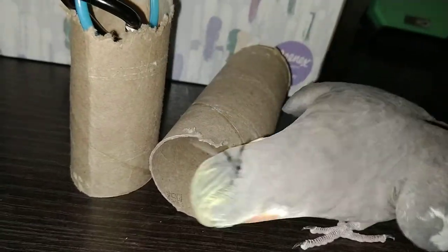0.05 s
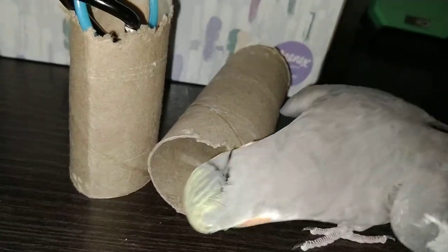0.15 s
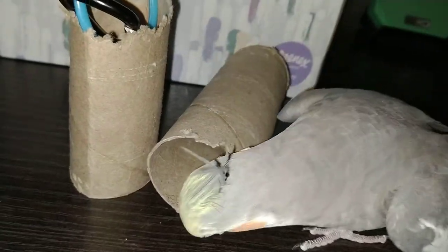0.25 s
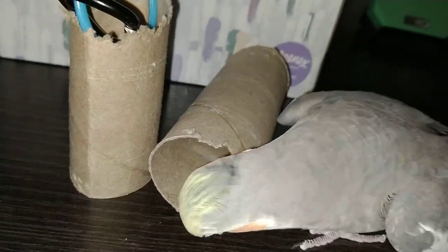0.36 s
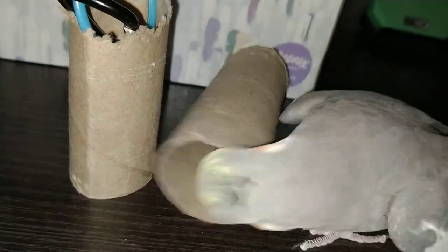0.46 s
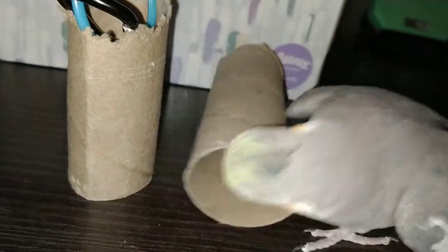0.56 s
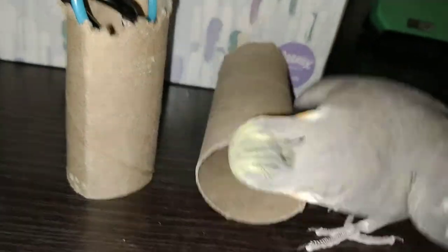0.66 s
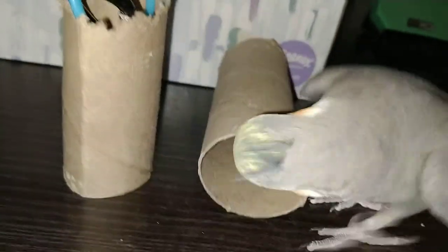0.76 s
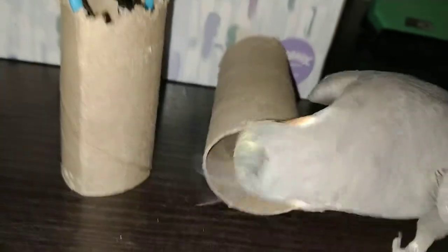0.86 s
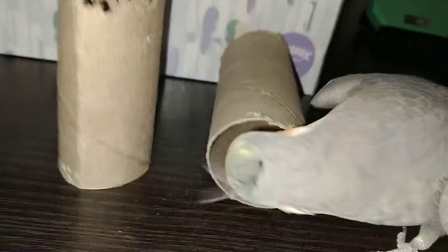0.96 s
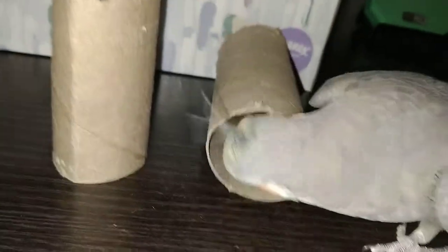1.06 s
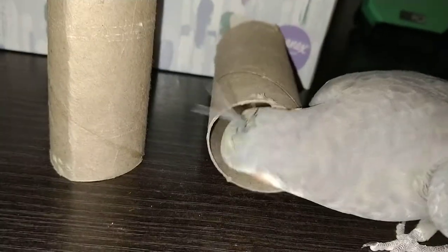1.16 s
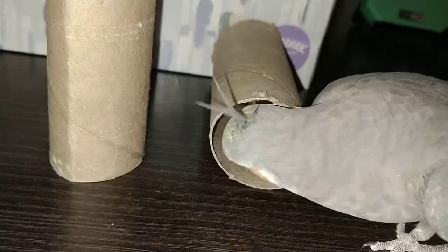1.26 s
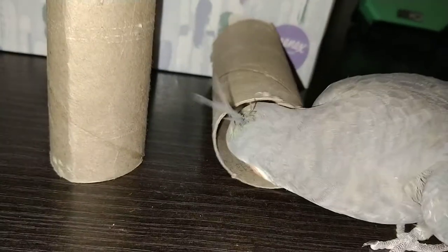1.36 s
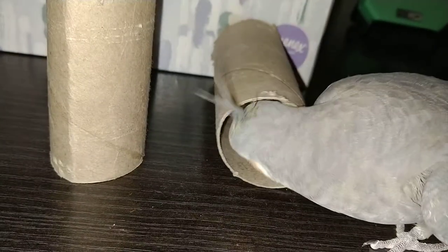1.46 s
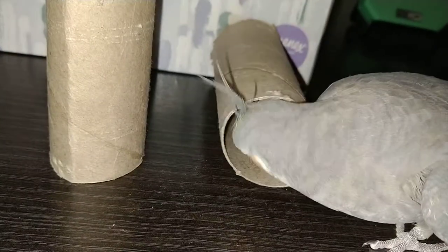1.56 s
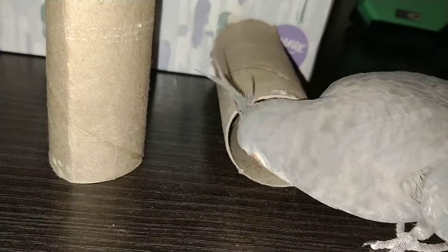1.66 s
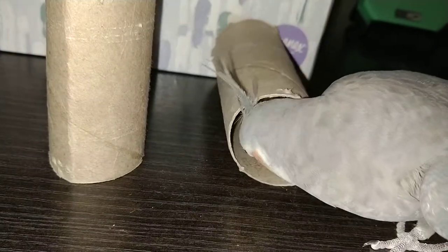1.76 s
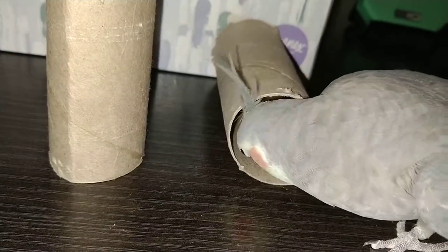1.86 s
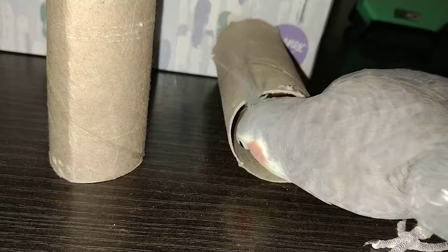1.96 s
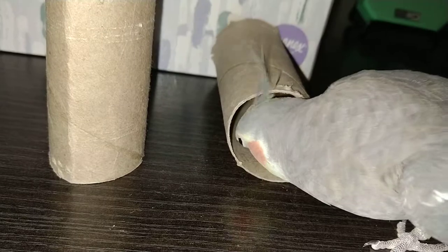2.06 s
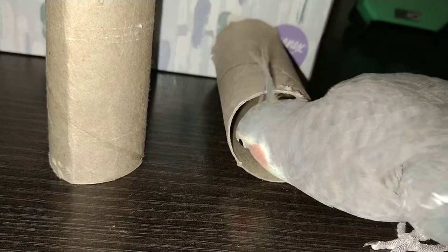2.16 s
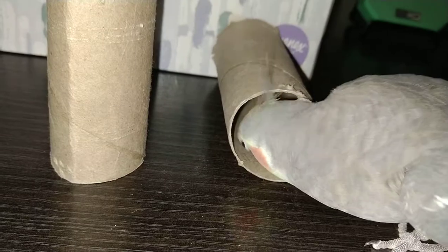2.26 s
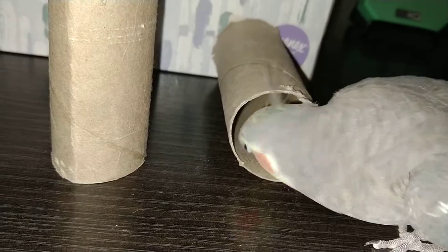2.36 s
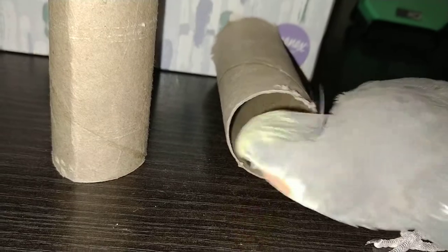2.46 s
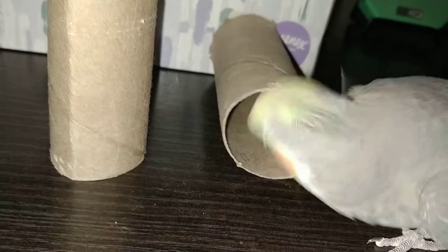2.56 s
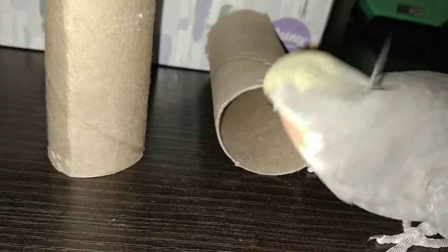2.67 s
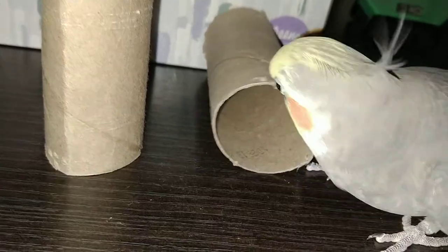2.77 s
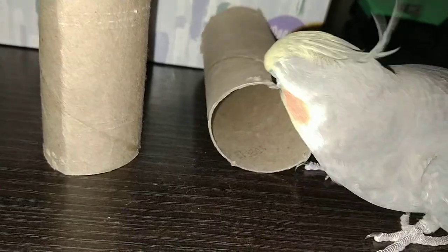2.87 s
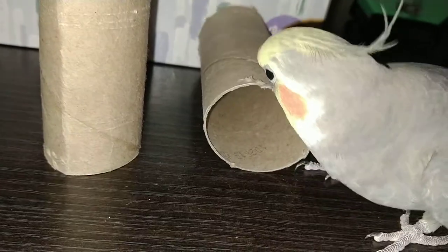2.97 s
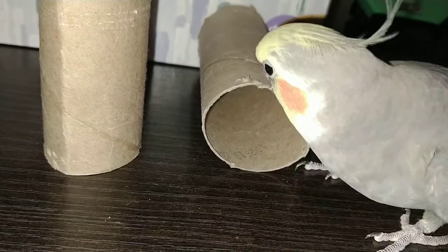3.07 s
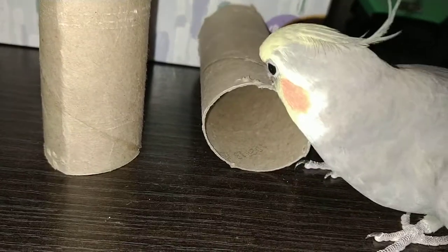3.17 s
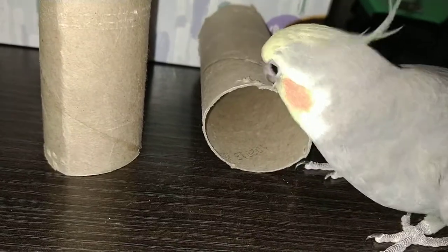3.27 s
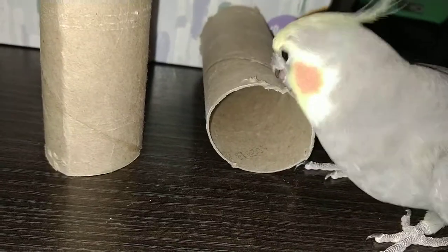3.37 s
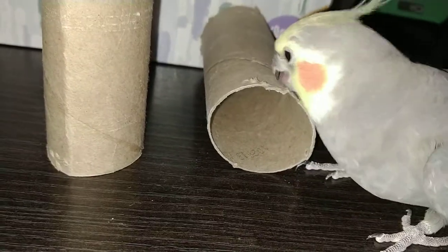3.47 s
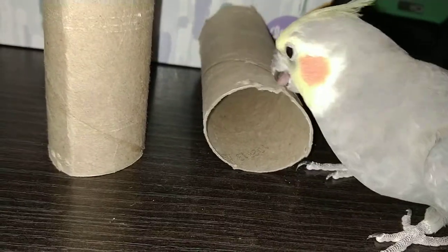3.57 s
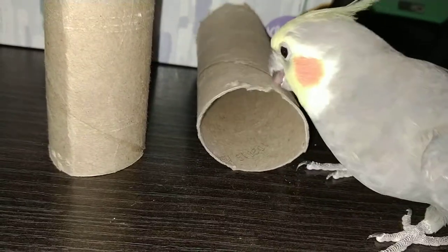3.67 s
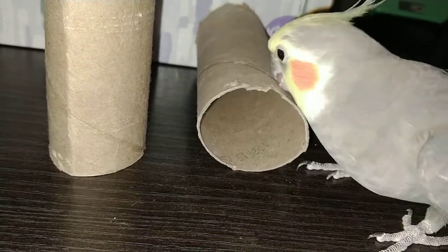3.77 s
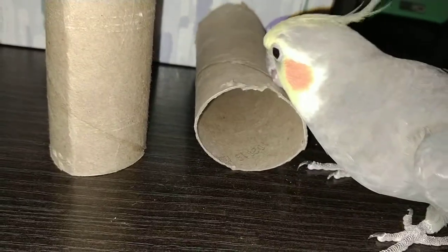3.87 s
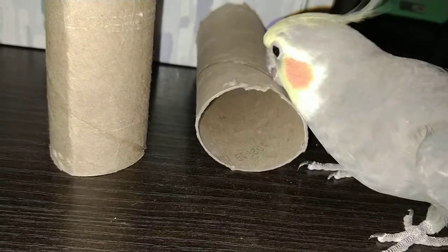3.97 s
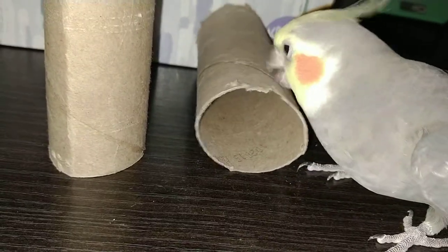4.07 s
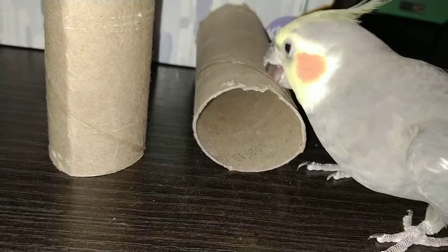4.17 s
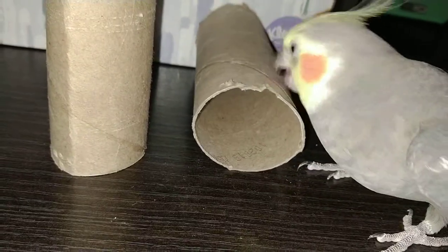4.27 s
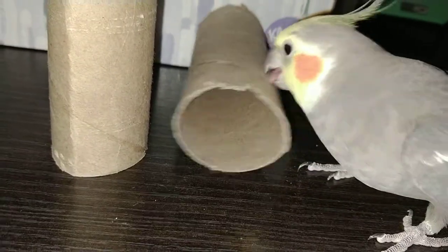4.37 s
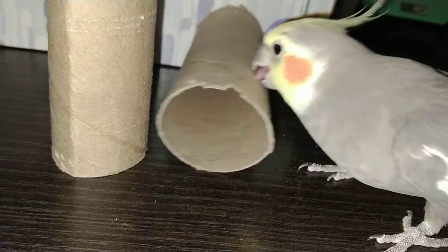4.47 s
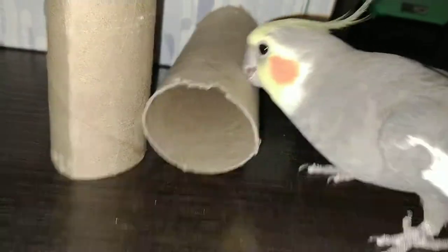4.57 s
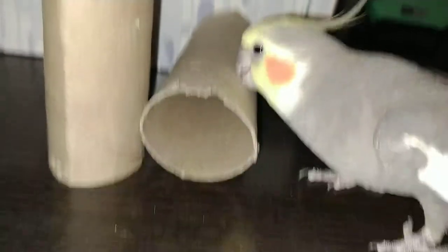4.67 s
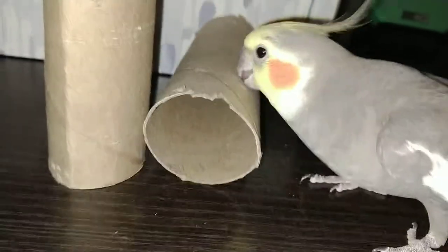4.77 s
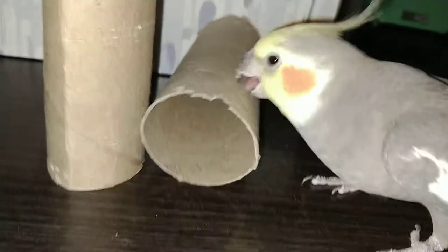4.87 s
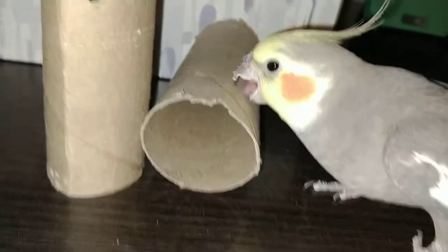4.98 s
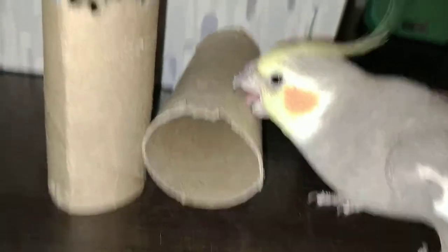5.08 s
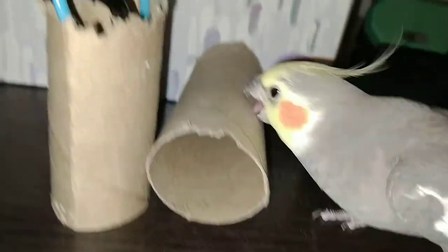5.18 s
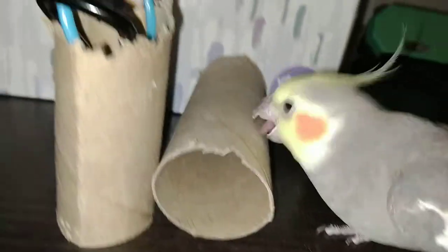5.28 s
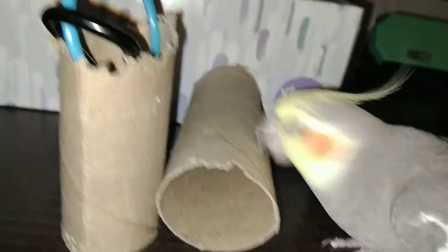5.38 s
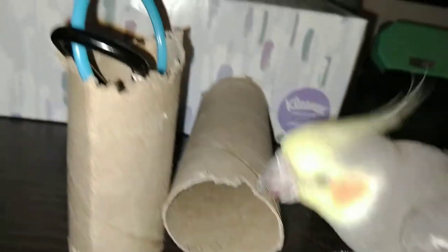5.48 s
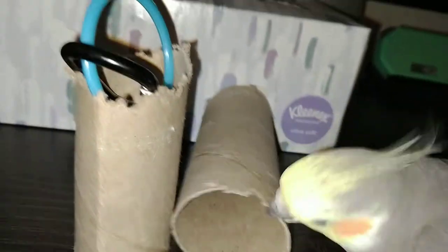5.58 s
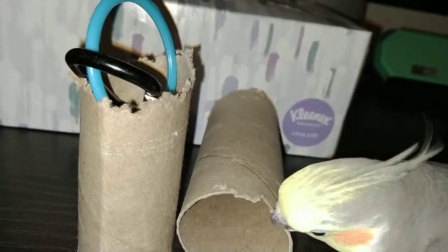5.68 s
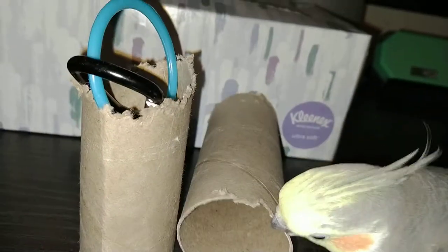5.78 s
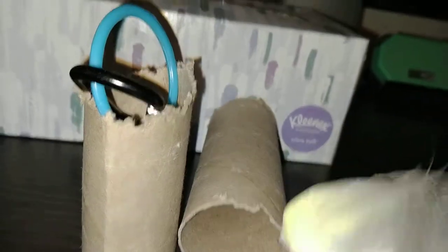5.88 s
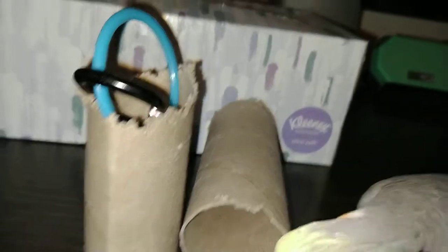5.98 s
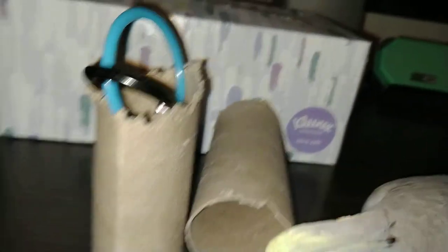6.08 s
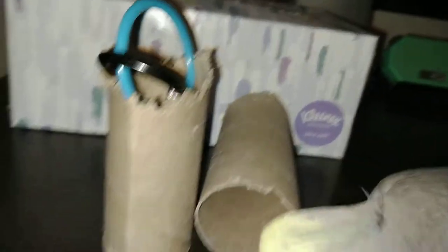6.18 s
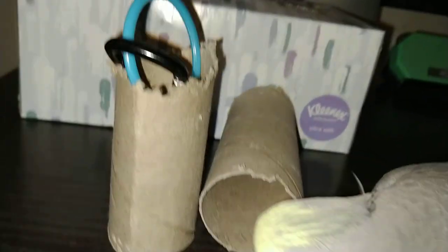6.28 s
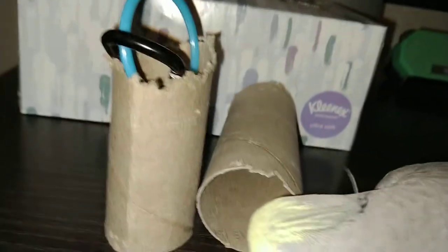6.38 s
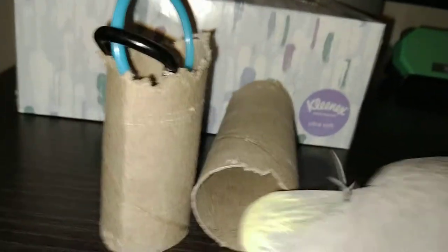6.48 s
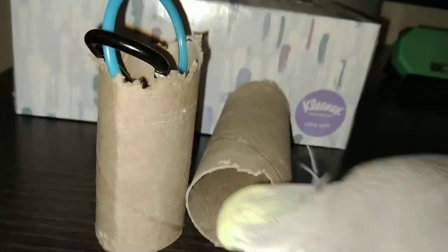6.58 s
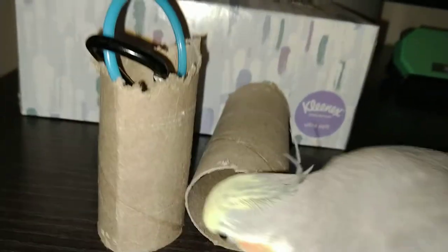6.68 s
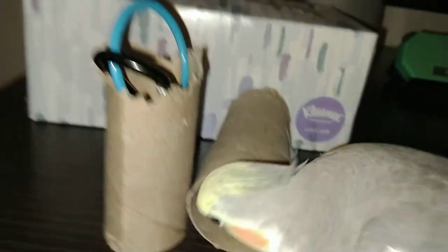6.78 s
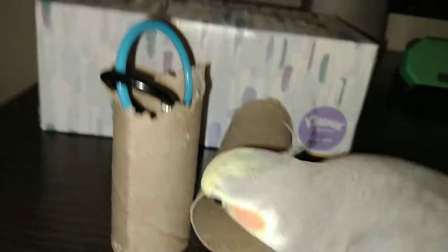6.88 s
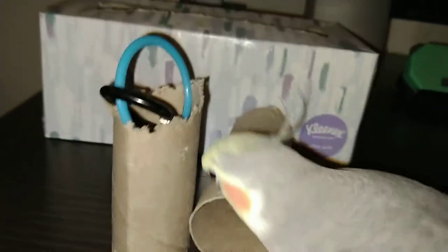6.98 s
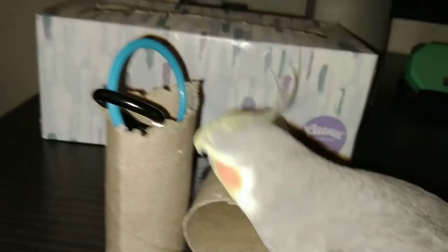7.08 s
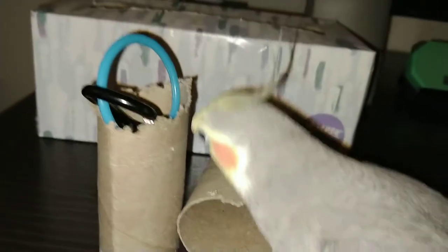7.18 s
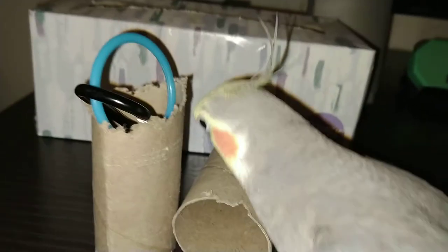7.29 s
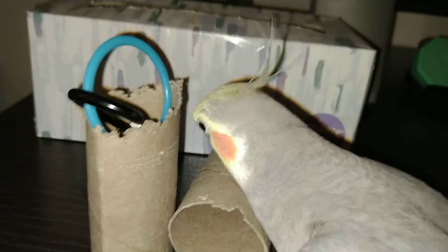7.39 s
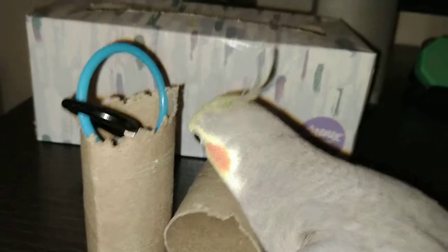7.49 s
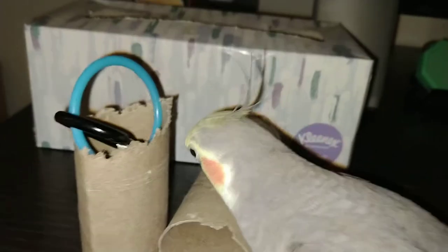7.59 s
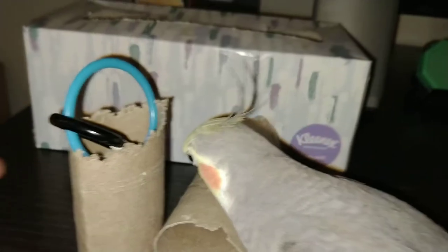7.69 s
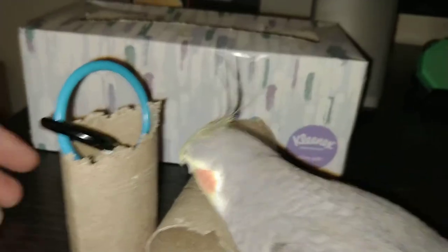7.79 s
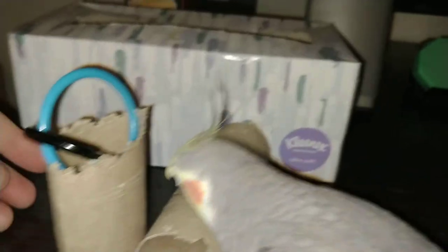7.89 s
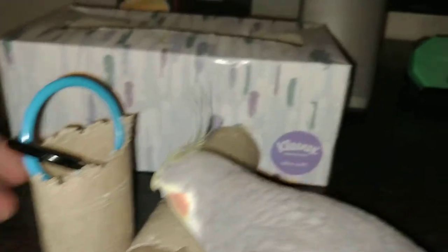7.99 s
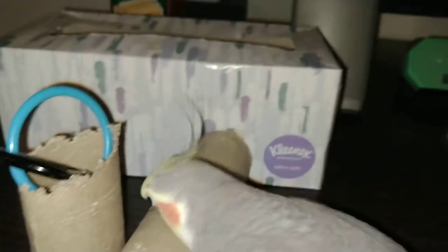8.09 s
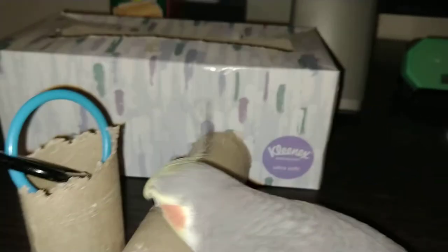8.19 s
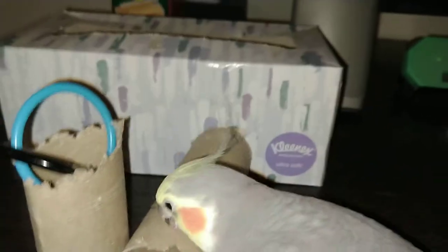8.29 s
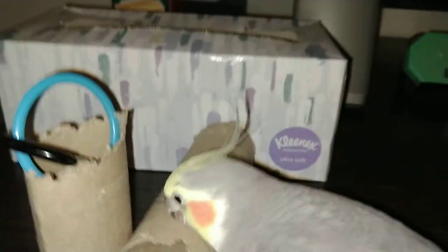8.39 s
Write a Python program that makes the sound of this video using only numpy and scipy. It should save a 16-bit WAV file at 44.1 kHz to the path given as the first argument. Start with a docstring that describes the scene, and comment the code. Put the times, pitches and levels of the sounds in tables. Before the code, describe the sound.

Close up in a quiet room, a pet bird works at a cardboard tube on a table. Faint hiss, hum and feather rustle come first, then a crack and dull knocks, and a heavy brushing thump just after one second. Light snaps and hollow tube rings grow busier around five seconds. Several low bumps follow near six, then quiet and a few last pecks.

```python
"""A cockatiel nibbles and nudges a cardboard tube on a table, close to a hand-held phone in a quiet room.
Room tone with a faint hum, a rumble of small shakes and a hiss of feathers are there from the start.
From 0.7 s dull knocks (soft pushes stirring damped modes) join in, then pecks: snap, crack and hollow ring.
From 1.1 s something brushes the phone (stick-slip noise) and the dragging beak makes the tube ring and crackle.
The strokes end by 6 s, brushes and knocks by 6.8 s; after a faint rustle, last pecks fall at 8.1 to 8.4 s."""
import sys
import numpy as np
from scipy import signal
from scipy.fft import rfft, irfft, next_fast_len
from scipy.io import wavfile

SR = 44100
rng = np.random.default_rng(int(sys.argv[2]) if len(sys.argv) > 2 else 0)


def wrap_up_sound(samples):
    """Save the sound to the file named by the first command line argument, as 16-bit audio."""
    columns = np.atleast_2d(samples).T
    # keep every value between -1 and 1, then stretch to whole-number steps
    tamed = np.clip(columns, -1, 1)
    steps = np.round(tamed * 32767).astype(np.int16)
    wavfile.write(sys.argv[1], SR, steps)


N = 372412  # length [samples]

# Base level of the room tone, before the dips: (time [s], level [dB])
ROOM_LEVEL = [(0, -58), (2, -58.5), (4.6, -58.5), (5.5, -56), (6.5, -54), (8.44, -56.5)]
# Brief sinks of the room tone, each creeping back: (time [s], nominal depth [dB])
DIPS = [(0.81, 5.5), (1.25, 7), (2.25, 3.5), (3.2, 10), (4.82, 4.5), (6.1, 4.5), (8.25, 8.5)]
# Base level of the handling rumble, before shuffles and strokes: (time [s], level [dB])
RUMBLE_LEVEL = [(0, -58), (0.55, -56), (0.98, -74), (1.3, -51.5), (1.6, -49), (2.2, -49.5), (2.4, -56),
                (2.95, -39), (3.3, -56), (4.05, -56.5), (4.4, -47), (4.65, -54.5), (4.8, -38.5),
                (5.45, -45.5), (6.2, -38), (6.9, -57), (7.9, -56), (8.3, -86.5)]
# Shuffles that shake the phone: (start [s], length [s], level [dB])
SHUFFLES = [(2.78, 0.058, -36), (3.72, 0.028, -47), (4.21, 0.023, -43), (5.83, 0.14, -27.5),
            (6.28, 0.081, -33.5), (6.62, 0.14, -36)]
# Feathers sliding as the bird moves: (start [s], length [s], level [dB])
RUSTLES = [(0, 0.38, -73.5), (0.3, .12, -69.5), (0.585, 0.042, -55), (0.67, 0.11, -59),
           (1.09, 0.061, -43.5), (1.235, 0.012, -57), (5.972, 0.0053, -57.5), (6.655, 0.0067, -56),
           (6.738, 0.023, -54), (6.8, 1, -84), (7.62, 0.38, -67), (8.14, 0.15, -63.5)]
# Something brushing the phone: (start [s], length [s], thud level [dB], grit level [dB])
BRUSHES = [(1.088, 0.057, -46.5, -51), (1.16, 0.02, -35.5, -32), (1.181, 0.018, -13, -27.5),
           (1.205, 0.022, -17.5, -36), (1.234, 0.032, -13.5, -27.5), (5.97, 0.015, -27, -39.5),
           (6.018, 0.0027, -32, -39), (6.37, 0.022, -48, -56), (6.418, 0.0062, -46, -55),
           (6.7105, 0.016, -18.5, -38), (6.732, 0.022, -23.5, -43)]
# Dull knocks, a higher cut-off being a harder contact:
# (time [s], thud level [dB], contact cut-off [Hz], boom level [dB], crack level [dB])
KNOCKS = [(0.702, -29.5, 352, -29.4, -66), (0.75, -29.5, 316, -33, -64), (0.7837, -27, 320, -35.5, -60),
          (0.8059, -37.5, 332, -39.5, -70), (1.23, -11, 281, -27, -65), (1.279, -39, 257, -24.5, -84),
          (2.851, -16.5, 430, -13, -47.5), (2.898, -46.5, 278, -35.5, -84),
          (2.981, -44.5, 236.2, -31.5, -67), (4.8147, -15.5, 660, -21, -50.5), (4.8386, -23, 320, -32, -63),
          (5.915, -34, 283, -19, -58), (5.955, -26.5, 310, -38, -58), (5.983, -44, 402, -50, -47.5),
          (6.018, -26.5, 340, -27.3, -49.5), (6.098, -17.5, 617, -10.5, -90),
          (6.296, -38.5, 292, -31, -65.5), (6.3549, -26, 184, -47, -80), (6.374, -40, 268, -31, -72),
          (6.393, -28, 235, -34, -70.7), (6.422, -33.5, 302, -31, -68), (6.508, -49, 250, -28.5, -85),
          (6.5673, -16.5, 346, -28.5, -53), (6.589, -29, 390, -26.5, -65), (6.71, -43, 560, -25, -70),
          (6.722, -25, 640, -12, -60), (6.756, -44, 526, -41, -52)]
# Modes of what the knocks travel through: (frequency [Hz], highest level [dB], t60 [s])
BODY_MODES = [(337, -37.5, 0.0067), (433, -36, 0.012), (750, -36.5, 0.021)]
# Strokes of the beak over the tube: (start [s], length [s], ring level [dB], crackle level [dB])
SCRAPES = [(1.14, 0.021, -59, -44.5), (1.97, 0.065, -73, -66), (2.08, 0.072, -69, -76),
           (2.25, .04, -66, -72), (2.818, 0.0067, -43.5, -48.5), (3.0, .15, -65, -68),
           (3.65, 0.12, -68.5, -76.5), (4.08, 0.017, -58, -65), (4.22, 0.034, -67, -72.5),
           (4.315, 0.015, -58, -69), (4.44, .025, -63, -65), (4.71, 0.033, -62, -59),
           (4.772, 0.032, -53.5, -78), (4.872, 0.034, -60.5, -73), (5.02, 0.025, -56.5, -65.5),
           (5.125, 0.016, -50.5, -65.5), (5.26, 0.024, -41, -51), (5.44, .04, -54.5, -61),
           (5.576, .015, -47, -57.5), (5.61, 0.03, -45, -54.5), (5.69, 0.072, -63.5, -64),
           (5.842, 0.036, -61, -59)]
# Beak snapping off the cardboard: (time [s], ring level [dB], centre of the ring [Hz],
# snap level [dB], crack level [dB], left minus right of the crack [dB])
PECKS = [(0.806, -66, 1390, -40, -29, 6.5), (0.993, -68, 1174, -99, -59.5, 8),
         (1.643, -75, 960, -87, -74, 11), (1.954, -57, 1600, -44, -44, -4),
         (2.169, -44.5, 1670, -42.5, -48, -3), (2.2445, -40, 1640, -41, -42, 1),
         (2.569, -84, 992, -81, -65, 0), (2.853, -50, 775, -41, -51, 24), (3.05, -60, 980, -68, -81, 4),
         (3.106, -51, 1440, -60.5, -64, -4), (3.198, -53, 1280, -43.5, -39, 4.5),
         (3.945, -76, 830, -78, -74.5, 17), (4.0646, -38.5, 1140, -45, -43.5, -2),
         (4.215, -48.5, 1010, -75, -60, -1), (4.43, -47.5, 925, -72, -61, 0),
         (4.704, -52, 1250, -67, -68, 0), (4.769, -35, 1160, -39, -48, 3),
         (4.814, -60, 919, -35.5, -66, 18), (4.8596, -42.5, 1040, -45.5, -44.5, -7),
         (4.9987, -47, 1020, -62, -57.5, -2), (5.012, -43.5, 1010, -63, -73, -1),
         (5.4335, -36.5, 1010, -74, -52.5, -1), (5.851, -65, 1138, -56, -70, 12),
         (6.657, -53.5, 1150, -57, -51, -5), (8.0758, -79, 1410, -44, -37.5, 7),
         (8.1624, -37.5, 1080, -73, -58, 6), (8.253, -40.5, 970, -40.5, -37, 3.5),
         (8.399, -51, 1120, -68.5, -71, 16)]
# Modes of the cardboard tube, before the contact favours some: (frequency [Hz], level [dB], t60 [s])
TUBE_MODES = [(808, 5.5, 0.029), (905, -1, 0.047), (1026, 3.5, 0.036), (1136, 2, 0.0081), (1150, 0, 0.017),
              (1414, -7, 0.061), (1480, -5, 0.046), (1550, -8, 0.047), (1770, -3, 0.016),
              (1828, -5.5, 0.017), (2620, -16.5, 0.04), (2970, -25.5, 0.021), (3170, -29, 0.014),
              (3800, -26.5, 0.017)]

# Spectrum of the background hiss: (frequency [Hz], relative density [dB per Hz])
ROOM_COLOUR = [(30, -16.5), (60, -17.5), (120, -1), (250, -5), (500, -13.5), (1000, -18), (2000, -28.5),
               (3200, -31), (5000, -36.5), (7000, -37), (11000, -33), (16000, -35)]
# Spectrum of the handling rumble: (frequency [Hz], relative density [dB per Hz])
RUMBLE_COLOUR = [(20, -22.5), (40, -17), (60, 4.5), (90, 2.5), (130, -0.5), (200, -10), (300, -23),
                 (500, -37)]
# Spectrum of sliding feathers: (frequency [Hz], relative density [dB per Hz])
RUSTLE_COLOUR = [(500, -11), (1000, -5), (2500, -11), (4000, -10.5), (6000, -10), (8000, -5.5),
                 (11000, 3.5), (14000, 0.5), (16000, -10)]
# Spectrum of the thudding under a brush: (frequency [Hz], relative density [dB per Hz])
THUD_COLOUR = [(30, -37.5), (60, -22.5), (100, 0.5), (180, -8.5), (280, -7.5), (450, -16), (700, -16.5),
               (1000, -41.5)]
# Spectrum of the grit on top of a brush: (frequency [Hz], relative density [dB per Hz])
GRIT_COLOUR = [(500, -11), (800, -3), (1400, -4), (2200, -12), (3200, -15.5), (4500, -28), (7000, -36.5)]
# Spectrum of fibre crackle and of a knock's faint crack: (frequency [Hz], relative density [dB per Hz])
CRACKLE_COLOUR = [(1500, -2), (3000, -0.5), (5500, -1), (7500, -1.5), (10500, -2), (13500, 3),
                  (16000, -11.5)]
# Filter curve of the short beak snap: (frequency [Hz], gain [dB])
SNAP_COLOUR = [(400, -5), (900, -5.5), (1600, 0.5), (3000, -1.5), (4500, -4.5), (6500, -21.5),
               (9000, -24.5)]
# Filter curve of the bright beak crack: (frequency [Hz], gain [dB])
CRACK_COLOUR = [(4000, -23), (7000, -3.5), (9000, -5), (11000, 3), (13500, 1.5), (15500, -7), (17000, -6)]

HUM_HZ, HUM_DB = 115, -5  # level relative to the room hiss
DIP_FALL_S, DIP_RECOVERY_DB_PER_S = .04, 10.5
SCRAPE_SHAKE_DB = 10  # rumble that a beak stroke sends through the table, relative to its ring
BOOM_HZ, BOOM_T60_S = 117.2, 0.048
# The bass trails a soft knock by this much; contacts harder than HARD_CONTACT_HZ arrive more compactly
BASS_LAG_S, HARD_CONTACT_HZ = 0.0031, 537
ROOM_T60_S = .45
PORT_LAG_S = .00042  # delay between the two microphones
HIT_SIZE, HIT_WINDOW_S = 8192, .01  # hit buffer [samples] and the window its level refers to [s]
CUTOFF_HZ = 16600


def from_db(db):
    """Decibels to gain."""
    return 10 ** (np.asarray(db) / 20)


def rms_one(x):
    """Scale to unit rms."""
    return x / np.sqrt(np.mean(x ** 2) + 1e-20)


def hit_level(x, db):
    """Scale a short sound so that its energy equals this rms level held for the hit window."""
    energy = np.sum(x ** 2) + 1e-20
    return x * from_db(db) * np.sqrt(HIT_WINDOW_S * SR / energy)


def level_curve(rows):
    """A (time, level) curve as a gain at every sample."""
    times, levels_db = np.transpose(rows)
    return from_db(np.interp(np.arange(N) / SR, times, levels_db))


def add(out, sound, time_s):
    """Mix a short stereo sound in at this time."""
    start = max(0, round(time_s * SR))
    part = sound[..., :N - start]
    out[..., start:start + part.shape[-1]] += part


def cut(x, hz, kind, order=2):
    """Butterworth low-pass or high-pass."""
    sos = signal.butter(order, min(hz, .45 * SR), kind, fs=SR, output="sos")
    return signal.sosfilt(sos, x + 1e-18)


def colour(x, spectrum):
    """Causal (minimum-phase) filter with this spectrum, falling away beyond its ends."""
    size = 2 * next_fast_len(len(x) // 2 + 1)
    hz, db = np.transpose(spectrum)
    hz = np.r_[hz[0] / 2, hz, hz[-1] * 2]
    db = np.r_[db[0] - 30, db, db[-1] - 40]
    bins_hz = np.arange(size // 2 + 1) * SR / size
    log_gain = np.log(from_db(np.interp(np.log(bins_hz + 1), np.log(hz), db)))
    # folding the cepstrum forward in time gives the minimum phase
    cepstrum = irfft(log_gain)[:size // 2]
    cepstrum[1:] *= 2
    response = np.exp(rfft(cepstrum, size))
    return irfft(rfft(x, size) * response)[:len(x)]


def ring(x, hz, t60):
    """One damped mode: a unit click sets a sine of height 1 ringing."""
    decay, angle = from_db(-60 / (t60 * SR)), 2 * np.pi * hz / SR
    feedback = [1, -2 * decay * np.cos(angle), decay ** 2]
    return signal.lfilter([0, np.sin(angle)], feedback, x + 1e-18)


def friction(per_s, spread_db):
    """Noise whose strength wanders at random, as fibres catch and slip; rms 1."""
    knots = np.clip(rng.standard_normal(N // 4), -2.2, 2.2)
    grip = np.interp(np.arange(N) * per_s / SR, np.arange(len(knots)), knots)
    return rms_one(rng.standard_normal(N) * from_db(spread_db * grip))


def burst(t60):
    """A puff of noise that dies away exponentially."""
    return rng.standard_normal(HIT_SIZE) * from_db(-60 * np.arange(HIT_SIZE) / SR / t60)


def strokes(rows, attack_s, build_db, release_s):
    """Gains of rubbing strokes, one per dB column: each sets in, presses harder by build_db, then lets go.
    Attack and release are the times for 20 dB."""
    t, power = np.arange(N) / SR, 0
    for start, length, *levels_db in rows:
        before = np.maximum(start - t, 0) / attack_s
        after = np.maximum(t - start - length, 0) / release_s
        pressure_db = build_db * (np.clip((t - start) / length, 0, 1) - 1)
        shape_db = pressure_db - 20 * np.minimum(before + after, 10)
        power = power + np.outer(from_db(levels_db), from_db(shape_db)) ** 2
    return np.sqrt(power)


def beak_strokes():
    """Gains of the tube's ring and of the fibre crackle while the beak drags."""
    return strokes(SCRAPES, attack_s=0.03, build_db=5.0, release_s=0.038)


def balance(left_db):
    """Left and right gains with this level difference and unit rms."""
    return rms_one(from_db([[left_db / 2], [-left_db / 2]]))


def ports(x, left_db, left_first):
    """Two microphones of opposite polarity at the ends of the phone; the farther one hears later."""
    late = np.r_[np.zeros(round(PORT_LAG_S * SR)), x][:len(x)]
    pair = np.array([x, -late] if left_first else [late, -x])
    return pair * balance(left_db)


def spread(make, likeness, left_db, left_first):
    """A noisy source: one part reaches both microphones, the rest differs between them."""
    both = np.sqrt(likeness) * ports(rms_one(make()), 0, left_first)
    own = np.sqrt(1 - likeness) * np.array([rms_one(make()), rms_one(make())])
    return (both + own) * balance(left_db)


def disperse(x, bass_lag_s, hz):
    """Bending waves travel slower the lower they are, so a knock arrives as a falling chirp."""
    f = np.arange(len(x) + 1) * SR / (2 * len(x))
    phase = 2 * np.pi * bass_lag_s * hz * np.arctan(f / hz)
    return irfft(rfft(x, 2 * len(x)) * np.exp(-1j * phase))[:len(x)]


def reverb(x, t60, wet_db):
    """The room's faint, dull, diffuse tail, different at each microphone."""
    t = np.arange(SR // 2) / SR
    tail = rng.standard_normal((2, len(t))) * from_db(-60 * t / t60) * (t > .003)
    tail /= np.sqrt(np.sum(tail ** 2, axis=1, keepdims=True))
    dull_tail = cut(tail, hz=6000, kind="low", order=1)
    return from_db(wet_db) * signal.fftconvolve(x, dull_tail, axes=1)[:, :N]


def dips():
    """Gain of the room tone as it sinks quickly and creeps back; the deepest dip wins."""
    t, sunk_db = np.arange(N) / SR, []
    for start, depth_db in DIPS:
        fall = np.clip((t - start) / DIP_FALL_S, 0, 1)
        remaining_db = np.maximum(depth_db - DIP_RECOVERY_DB_PER_S * (t - start), 0)
        sunk_db.append(fall * remaining_db)
    return from_db(-np.max(sunk_db, axis=0))


def room_tone():
    """Soft, smooth background noise with a faint hum whose phase wanders slowly."""
    hiss = spread(lambda: colour(rng.standard_normal(N), ROOM_COLOUR),
                  likeness=0.69, left_db=1.0, left_first=True)
    wobble = rms_one(cut(rng.standard_normal(N), 3.4, "low"))
    hum = np.sin(2 * np.pi * HUM_HZ * np.arange(N) / SR + .7 * wobble)
    hum_pair = ports(rms_one(hum), left_db=8.5, left_first=True)
    return level_curve(ROOM_LEVEL) * dips() * (hiss + from_db(HUM_DB) * hum_pair)


def rumble():
    """Small, uneven shakes of the phone, stronger with each shuffle and beak stroke."""
    shakes = rms_one(colour(friction(per_s=36, spread_db=4.0), RUMBLE_COLOUR))
    shuffling = strokes(SHUFFLES, attack_s=0.047, build_db=.5, release_s=.12)[0]
    ring_gain, _ = beak_strokes()
    stirred = np.hypot(shuffling, from_db(SCRAPE_SHAKE_DB) * ring_gain)
    gain = np.hypot(level_curve(RUMBLE_LEVEL), stirred)
    return ports(gain * shakes, left_db=4.5, left_first=True)


def feathers():
    """Barbs sliding over each other give a fine, bright hiss."""
    hiss = spread(lambda: colour(friction(per_s=780, spread_db=4.5), RUSTLE_COLOUR),
                  likeness=0.5, left_db=10.0, left_first=True)
    return strokes(RUSTLES, attack_s=0.011, build_db=5.0, release_s=0.061)[0] * hiss


def brush():
    """Sticking and slipping on the phone's case: lumpy thudding with grit on top."""
    thud_gain, grit_gain = strokes(BRUSHES, attack_s=0.0095, build_db=3.0, release_s=.014)
    thud = rms_one(colour(friction(per_s=300, spread_db=1.5), THUD_COLOUR))
    grit = spread(lambda: colour(friction(per_s=540, spread_db=2.5), GRIT_COLOUR),
                  likeness=0.77, left_db=4.0, left_first=True)
    return ports(thud_gain * thud, left_db=4.5, left_first=True) + grit_gain * grit


def knocks():
    """Each knock is one soft push that stirs a few damped modes, with a low boom and a faint contact crack.
    The softer the contact, the further its bass trails."""
    out, click = np.zeros((2, N)), signal.unit_impulse(HIT_SIZE)
    for time_s, thud_db, contact_hz, boom_db, crack_db in KNOCKS:
        push = cut(cut(click, contact_hz, "low"), 2.46 * contact_hz, "low")
        # the place of the blow decides how strongly each mode answers
        modes = sum(rng.uniform(-1, 1) * from_db(db) * ring(push, hz, t60) for hz, db, t60 in BODY_MODES)
        thud = hit_level(cut(push + modes, hz=208, kind="high"), thud_db)
        low_ring = ring(push, BOOM_HZ, BOOM_T60_S)
        boom = hit_level(cut(low_ring, hz=60, kind="high", order=1), boom_db)
        crack = hit_level(colour(burst(t60=0.054), CRACKLE_COLOUR), crack_db)
        bass_lag_s = BASS_LAG_S / (1 + (contact_hz / HARD_CONTACT_HZ) ** 8)
        arrival = disperse(thud - boom, bass_lag_s, hz=130)
        add(out, ports(arrival + crack, left_db=5.0, left_first=True), time_s)
    return out


def tube(force, centre_hz):
    """The tube's modes; the place of contact favours those around one pitch."""
    hz, db, t60 = np.transpose(TUBE_MODES)
    favour_db = -9 * abs(np.log2(hz / centre_hz))  # 9 dB less per octave away
    chance_db = 2.5 * rng.standard_normal(len(hz))
    weights = from_db(db + favour_db + chance_db) * rng.choice([-1, 1], len(hz))
    return sum(w * ring(force, f, t) for w, f, t in zip(weights, hz, t60))


def scrape():
    """The dragging beak plucks fibres, which crackle and keep the tube ringing."""
    ring_gain, crackle_gain = beak_strokes()
    slips = friction(per_s=510, spread_db=5.5)
    hollow = rms_one(cut(tube(slips, centre_hz=1000), hz=688, kind="high"))
    crackle = rms_one(colour(slips, CRACKLE_COLOUR))
    return ports(ring_gain * hollow + crackle_gain * crackle, left_db=-.8, left_first=False)


def pecks():
    """The beak snaps off the cardboard: a sharp crack, a short snap and the hollow ring of the tube."""
    out, click = np.zeros((2, N)), signal.unit_impulse(HIT_SIZE)
    for time_s, ring_db, centre_hz, snap_db, crack_db, left_db in PECKS:
        force = click + .07 * burst(t60=.06)
        # the limp wall adds a broad, quickly damped rattle to the modes
        wall = 6.5 * ring(force, 1.124 * centre_hz, t60=0.0034)
        hollow = hit_level(cut(tube(force, centre_hz) + wall, hz=638.4, kind="high"), ring_db)
        snap = hit_level(colour(click + 0.81 * burst(t60=0.0087), SNAP_COLOUR), snap_db)
        # torn fibres crackle on for a moment
        tear = click + 0.36 * burst(t60=0.0053) + 0.01 * burst(t60=0.089)
        crack = hit_level(colour(tear, CRACK_COLOUR), crack_db)
        add(out, ports(hollow + snap, left_db=-0.9, left_first=False), time_s)
        add(out, ports(crack, left_db, left_first=False), time_s)
    return out


def scene():
    """Beak sounds travel through the air and the room; the rest is mixed in without reverb."""
    background = room_tone() + rumble()
    handling = feathers() + brush() + knocks()
    beak = scrape() + pecks()
    return background + handling + beak + reverb(beak, ROOM_T60_S, wet_db=-21.0)


def record(dry):
    """The deep bass is rolled off, peaks stop at full scale and the top is cut."""
    level = np.clip(cut(dry, hz=42, kind="high"), -1, 1)
    top_cut = signal.ellip(10, .2, 80, CUTOFF_HZ, fs=SR, output="sos")
    return signal.sosfilt(top_cut, level)


dry = scene()
out = record(dry)
wrap_up_sound(out)
```